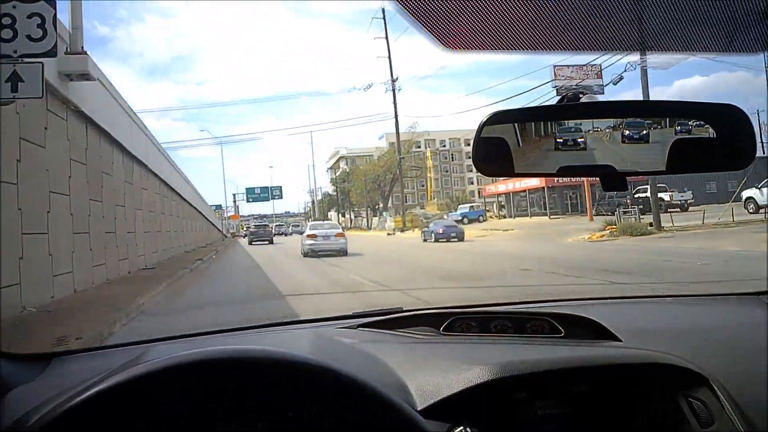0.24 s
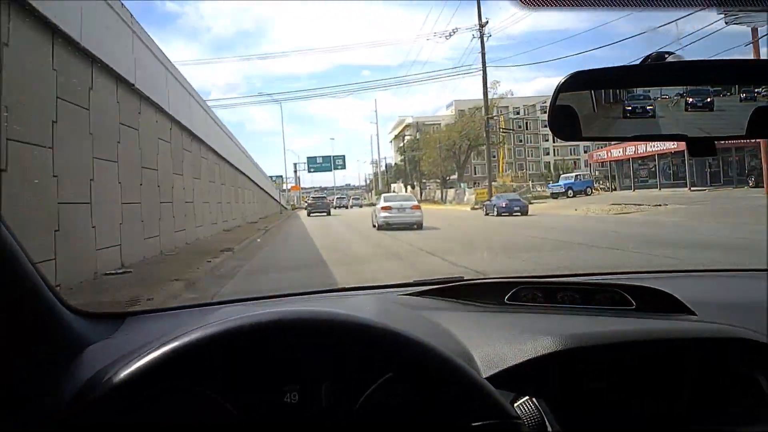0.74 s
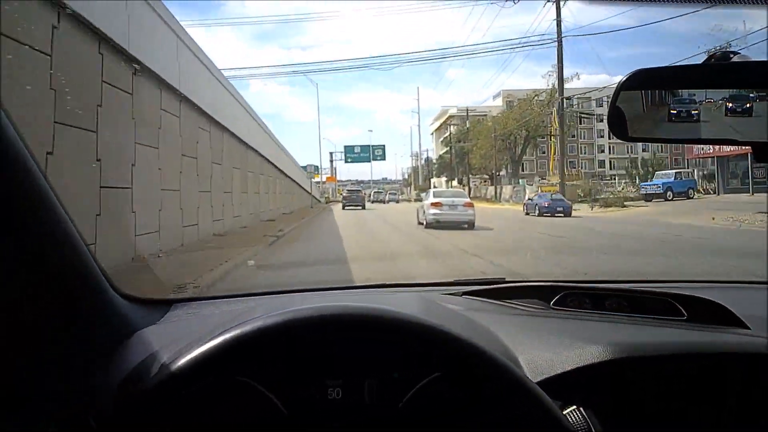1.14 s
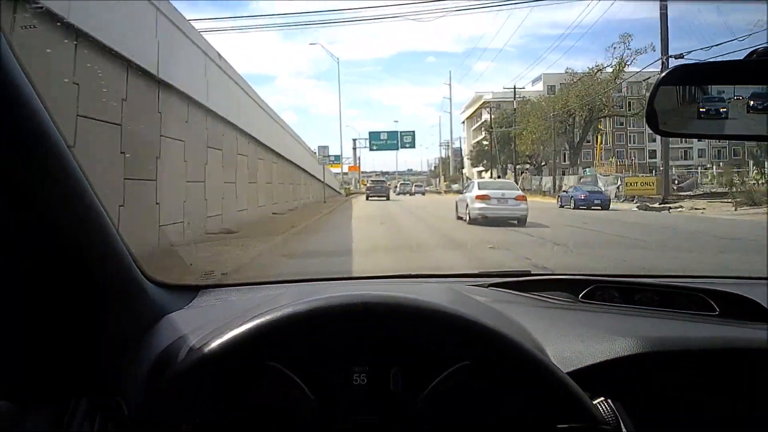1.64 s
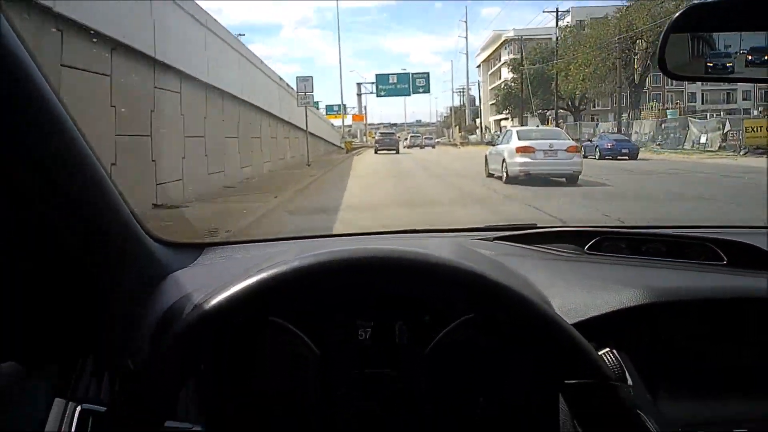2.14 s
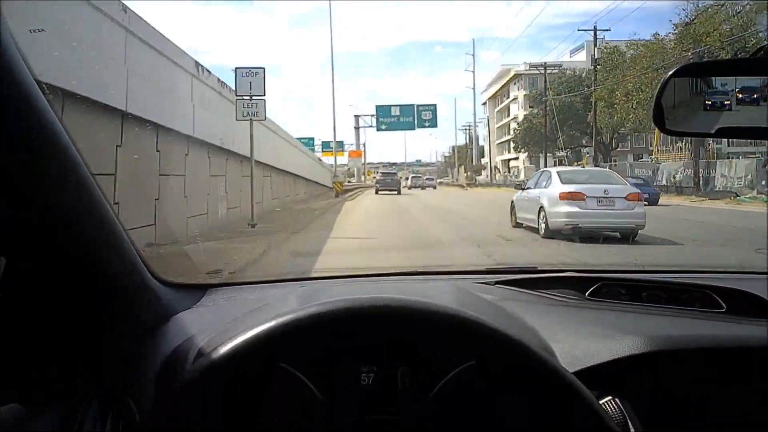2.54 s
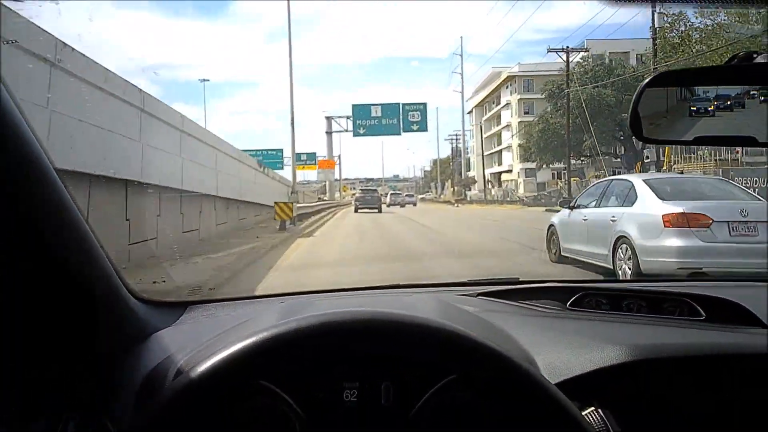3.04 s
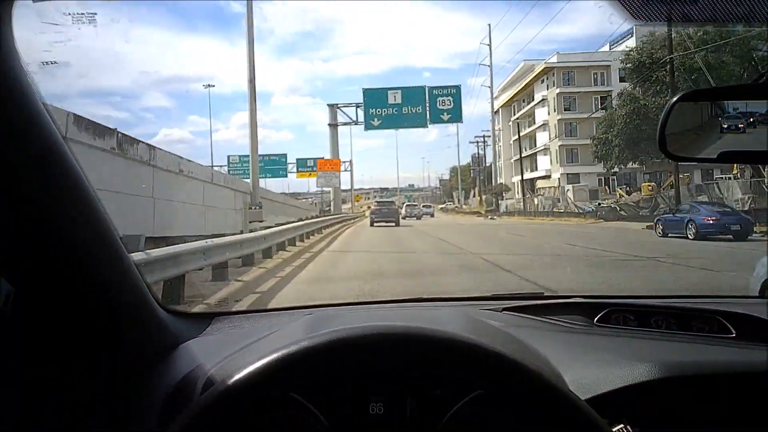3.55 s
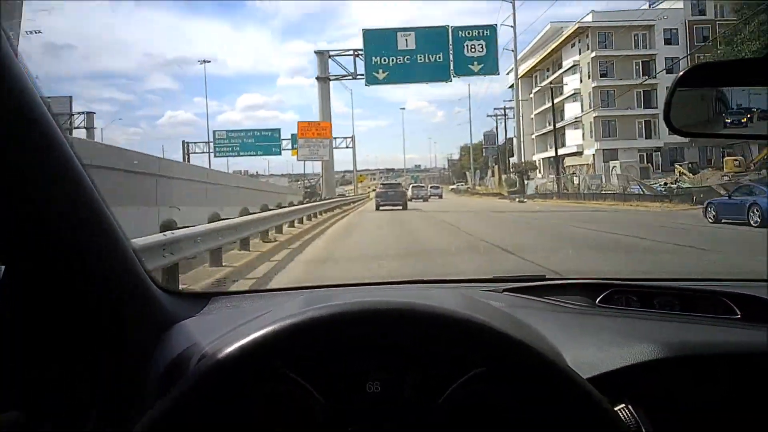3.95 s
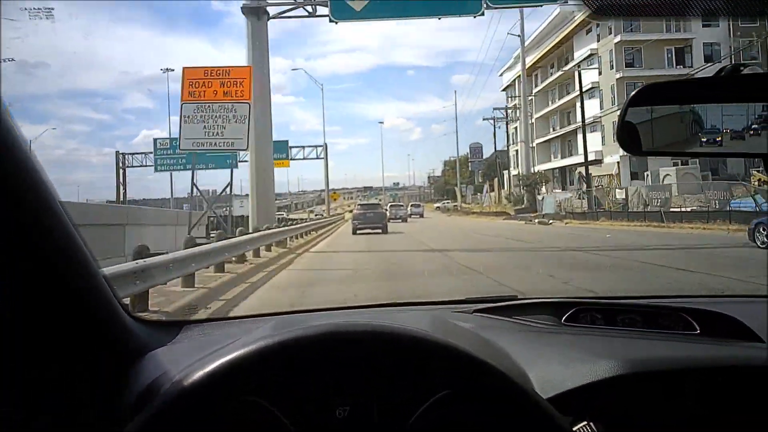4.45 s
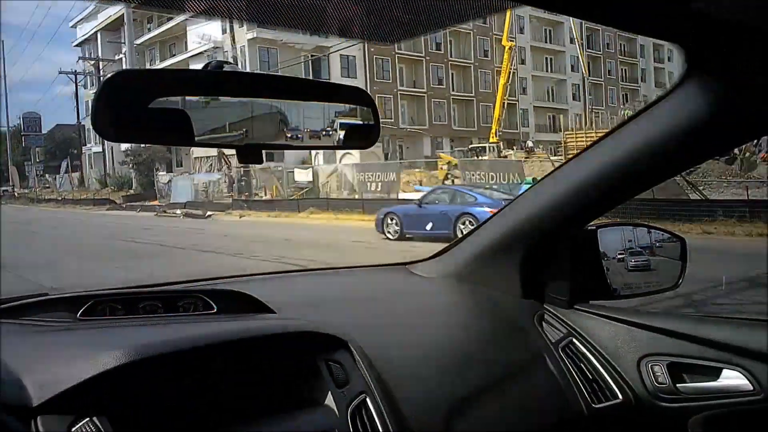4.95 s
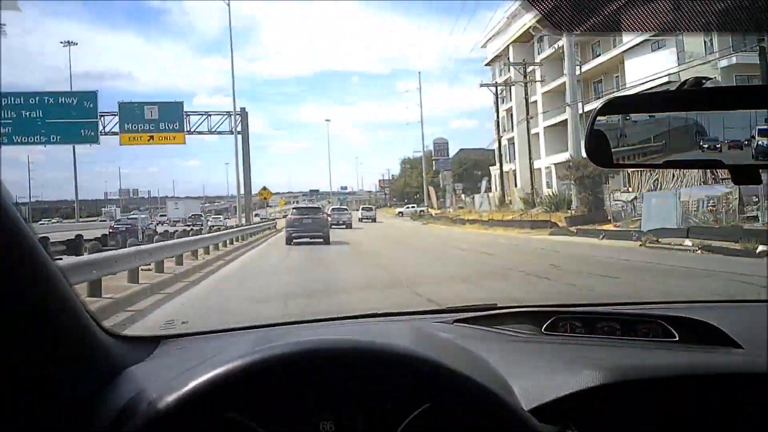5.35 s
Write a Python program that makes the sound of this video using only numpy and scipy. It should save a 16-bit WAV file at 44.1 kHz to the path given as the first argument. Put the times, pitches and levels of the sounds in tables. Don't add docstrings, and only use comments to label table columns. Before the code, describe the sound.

The sound starts mid-acceleration inside a car cabin. A strong, resonant engine drone rises steadily from 0 to about 1.9 seconds, with intake roar, fine valve sizzle and faint hiss around it. A few light plastic ticks sound in the first second, and deep body bumps begin near 1.1. At 1.9 the throttle closes, with a short air puff at 2.0; heavy low thumps, a faint gear whine and a dry clutch scuff fill the upshift until about 2.4. The engine note drops markedly, then pulls again, lower and climbing gently, under a fuller airy roar. At 3.94 it cuts suddenly to a soft burble that fades into a steady, slightly falling coast. Tyre rumble grows, with a road joint at 4.35, a sharp bright trim click at 4.5, a smoother dip near 4.65, and low bumps around 5.45. Close, damped and dull on top, through a small head-worn microphone.

```python
import sys
import numpy as np
from scipy import signal
from scipy.fft import rfft, irfft, next_fast_len
from scipy.io import wavfile
from scipy.ndimage import uniform_filter1d

SR = 44100
rng = np.random.default_rng(int(sys.argv[2]) if len(sys.argv) > 2 else 0)


def master_out(mix):
    frames = np.transpose(np.atleast_2d(mix))
    ceiling = np.clip(frames, -1, 1)
    pcm = np.round(ceiling * 32767).astype(np.int16)
    wavfile.write(sys.argv[1], SR, pcm)


def field_ratio(decibels):
    return 10 ** (np.asarray(decibels, dtype=float) / 20)


N = 247401
T = np.arange(N) / SR
CLUTCH_S = 2.3
SHUT_DB = -42.5

# [opens_s, build_up_s, shuts_s, fall_db_per_s]
PULLS = [
    (-.16, .12, 1.884, 116),
    (2.28, .13, 3.94, 746),
]


def read(points, hz):
    f, value = np.transpose(points)
    return np.interp(np.log(hz + 1), np.log(f + 1), value)


def evened(x):
    return x / np.sqrt(np.mean(x ** 2) + 1e-20)


def swells(rows):
    return sum(db * np.exp(-(2 * (T - s) / length) ** 2) for s, db, length in rows)


def wander(rate_hz, t=T):
    knots_per_s = 60
    knots = rng.standard_normal(int(T[-1] * knots_per_s) + 2)
    knot_hz = np.fft.rfftfreq(len(knots), 1 / knots_per_s)
    spectrum = rfft(knots) / (1 + (knot_hz / rate_hz) ** 4)
    drift = evened(irfft(spectrum, len(knots)))
    return np.interp(t, np.arange(len(knots)) / knots_per_s, drift)


def noise(colour, patchy_db, flicker_db):
    frames, hz = N // 256 + 5, np.fft.rfftfreq(1024, 1 / SR)
    real, imaginary, patches = rng.standard_normal((frames, 513, 3)).T
    patches = uniform_filter1d(patches, size=10, axis=0)
    patches = evened(uniform_filter1d(patches, size=12, axis=1))
    flicker = evened(uniform_filter1d(rng.standard_normal(frames), size=3))
    level_db = read(colour, hz)[:, None] + patchy_db * patches + flicker_db * flicker
    z = (real + 1j * imaginary) * field_ratio(level_db)
    return evened(signal.istft(z, nperseg=1024, noverlap=768)[1][:N])


def tinted(colour):
    size = next_fast_len(N)
    gain = field_ratio(read(colour, np.fft.rfftfreq(size, 1 / SR)))
    return evened(irfft(rfft(rng.standard_normal(size)) * gain, size)[:N])


def cycle_rate():
    # [time_s, cycle_hz]
    speed = [(0, 39.43), (0.3, 42.18), (0.45, 43.91), (0.6, 45.02), (1.05, 47.91), (1.35, 50.18),
             (1.5, 50.47), (1.9, 53.69), (2.0, 53.3), (2.3, 46.2), (2.4, 41.5), (2.5, 35.98), (2.6, 36.85),
             (3.3, 39.55), (3.6, 41.0), (3.93, 42.23), (4.4, 40.69), (5.6, 40.19)]
    s, hz = np.transpose(speed)
    return np.interp(T, s, hz)


def load():
    # [centre_s, change_db, length_s]
    sags = [
        (1.25, -1.5, 0.18),
        (2.52, -2.5, 0.19),
    ]
    pulls = []
    for opens, build, shuts, fall in PULLS:
        rise_db = 20 * np.log10(1 - np.exp(-np.maximum(T - opens, 1e-6) / build))
        pulls.append(rise_db - fall * np.maximum(T - shuts, 0))
    return np.maximum(np.max(pulls, axis=0) + swells(sags), SHUT_DB)


def cabin(hz):
    # [centre_hz, width_hz, level_db]
    modes = [(148.9, 14.6, 18), (208, 17, -1.4), (236.6, 20, 1.1), (256.6, 18.36, 11), (273, 14, -10),
             (319.5, 29, -13), (384.4, 26, 1.2), (399, 15, -1.1), (482, 29, 6.5), (528, 35, -5),
             (555.5, 15, -8.5), (595, 23, -9.5), (683, 54, 0.1), (759, 51, 9.6)]
    response = sum(field_ratio(db) / (1 + 2j * (hz - f) / width) for f, width, db in modes)
    return 20 * np.log10(abs(response) + 1e-3)


def engine():
    # [cycle_multiple, rms_db, slope_db_per_hz, bend_db_per_hz2], at mid_hz
    firing = [(4, -29, 1.33, -0.0586), (5, -31, -0.88, 0.0169), (6, -40.5, 0.5, 0.1368),
              (7, -8.5, 0.64, -0.2723), (8, -23.5, -0.24, 0.0115), (9, -31.5, -1.36, 0.1523),
              (10, -37.5, -1.5, -0.0615), (11, -42.7, -0.38, 0.2074), (12, -34.5, 0.82, -0.0792),
              (13, -36, 0.23, -0.2305), (14, -43, -0.33, -0.1817), (15, -47, -1.14, 0.0741),
              (16, -55.0, -1.13, 0.2491)]
    # [cycle_multiple, rms_db, loudest_at_cycle_hz,
    # speed_range_hz]
    side_lines = [(10.45, -33.5, 48, 2.2), (16.17, -38.5, 46, 1.7), (19.09, -42.5, 40.5, 2.5),
                  (13, -36.5, 41, 1.2), (16, -40.5, 52, 1.2), (28.05, -50, 53, 2),
                  (39.15, -51.5, 37.5, 2.9), (39.6, -59, 48.5, 2.2), (40, -53, 52.5, 1.7)]
    # [cycle_multiple, rms_db]
    coast = [(3, -30.5), (4, -34.5), (6, -38.5), (8, -41), (12, -48), (16, -50), (20, -49)]
    mid_hz = 44.5
    knock_db, knock_slope_db = -51, -0.7957
    burble_db, burble_s = 4.5, 0.37
    step = 8
    t, hz, load_db = T[::step], cycle_rate()[::step], load()[::step]
    turns = np.cumsum(hz) * step / SR

    def line(multiple, db, wobble_db, slip):
        phase = multiple * turns + rng.random() + slip * wander(5.2, t)
        return np.sqrt(2) * field_ratio(db + wobble_db * wander(14, t)) * np.sin(2 * np.pi * phase)

    out = np.zeros(len(t))
    for multiple, db, db_per_hz, bend in firing:
        lead = multiple == 7
        off_hz = hz - mid_hz
        full_db = db + (db_per_hz + bend * off_hz) * off_hz + cabin(multiple * hz)
        level_db = full_db + load_db * (1 if lead else 1.4)
        out += line(multiple, level_db, 0.7 if lead else 0.19 * multiple, 0.0004 * multiple ** 2)
    for multiple, db, at_hz, range_hz in side_lines:
        out += line(multiple, db - 6 * ((hz - at_hz) / range_hz) ** 2 + load_db, 2.9, 0.081)
    for multiple in range(17, 38):
        level_db = knock_db + knock_slope_db * (multiple - 17) + load_db + 3.2 * wander(2.1, t)
        out += line(multiple, level_db, 0.46, 0.014)
    shut = np.clip(-load_db / 30, 0, 1) ** 2
    burble = field_ratio(burble_db * np.exp(-abs(t - PULLS[-1][2]) / burble_s))
    out += shut * burble * sum(line(multiple, db, 2.0, 0.053) for multiple, db in coast)
    return signal.resample_poly(out, step, 1)[:N]


def roar():
    # [freq_hz, level_db]
    roar_colour = [(150, -24.5), (260, 0.5), (420, -1), (600, -9), (900, -10), (1500, -16.5), (1780, -25.5),
                   (2100, -24), (2900, -38.5), (4400, -44), (6000, -49.5)]
    # [freq_hz, level_db]
    hiss_colour = [(2500, 2), (4500, -3), (5700, 4.5), (7200, 5.5), (7800, -11.5), (8300, -30), (9000, -62)]
    # [freq_hz, level_db]
    valve_colour = [(1500, -26.5), (2200, -3.5), (2900, -6), (3500, 0), (3900, 1), (4300, -8.5),
                    (4800, -22)]
    # [centre_s, change_db, length_s]
    puffs = [
        (.91, 0, .04),
        (2.03, 4, .04),
        (3.95, 0, 0.033),
    ]
    roar_db, db_per_hz, full_hz = -34.5, 0.8439, 46.4
    gear_db, gear_s, coast_db = 5.5, 0.13, -3
    valves_db, hiss_db = -57.5, -65
    hz, load_db = cycle_rate(), load()
    pulse = 1 + 0.028 * field_ratio(load_db) * np.cos(2 * np.pi * np.cumsum(hz) / SR)
    db = roar_db + db_per_hz * np.minimum(hz - full_hz, 0) + swells(puffs)
    db = db + gear_db * (1 + np.tanh((T - CLUTCH_S) / gear_s)) / 2 + coast_db * load_db / SHUT_DB
    intake = field_ratio(db + 5.0) * pulse * noise(roar_colour, 0.43, 0.23)
    sizzle_db = valves_db + 0.11 * load_db + 0.34 * (hz - 44.5) + 0.61 * wander(2.7)
    valves = field_ratio(sizzle_db) * noise(valve_colour, 1.2, 0.31)
    hiss = field_ratio(hiss_db + 0.25 * (db + 30.5)) * noise(hiss_colour, 0.8, 0.4)
    return intake + valves + hiss


def boom():
    # [centre_s, peak_db, pitch_hz, length_s]
    bumps = [(0.147, -26.5, 27.7, 0.06), (1.11, -19.5, 28.5, 0.044), (1.222, -23, 29.3, 0.05),
             (1.377, -25.5, 27.7, 0.06), (1.672, -28, 26, 0.061), (1.848, -21, 28.9, 0.05),
             (1.996, -18.5, 24.2, 0.049), (2.131, -13, 29.6, 0.059), (2.321, -15, 24.9, 0.092),
             (2.42, -25, 26.36, 0.3), (2.627, -19, 26.9, 0.045), (3.052, -18.5, 28, 0.05),
             (3.19, -19.5, 30.1, 0.04), (3.39, -24.5, 25, 0.04), (3.499, -24, 24.8, 0.06),
             (3.737, -22, 32.1, 0.077), (3.92, -25.5, 36.7, 0.05), (4.035, -16, 30.1, 0.037),
             (4.116, -19.5, 31.67, 0.27), (4.255, -22.5, 31.8, 0.21), (4.61, -24.5, 29.2, 0.14),
             (4.89, -22.5, 30.1, 0.057), (5.443, -16.5, 35, 0.06), (5.52, -19, 30.0, 0.054)]
    thuds_db = -31
    waver = np.cumsum(0.08 * wander(6.8)) / SR
    tone = np.zeros(N)
    for s, db, hz, length in bumps:
        swell = field_ratio(db) * np.exp(-((T - s) / length) ** 2)
        tone += swell * np.sin(2 * np.pi * hz * (T - s + waver))
    thuds = tinted([(6, -18.5), (14, 2.0), (30, 6), (52, 4), (75, -22), (150, -63.5)])
    return np.sqrt(2) * tone * field_ratio(0.9 * wander(7.2)) + field_ratio(thuds_db) * thuds


def tyres():
    # [freq_hz, level_db]
    rumble_colour = [(12, -7.5), (40, -2), (62, 0.5), (115, 6), (160, -2), (210, -2.5), (300, -24),
                     (450, -25), (700, -59.5)]
    # [centre_s, change_db, length_s]
    joints = [(.36, -6.5, .1), (.51, 3, 0.037), (.84, 3.5, 0.07), (1.54, -11.5, .08), (1.96, 3, .08),
              (2.27, -5, 0.061), (2.48, 2, .1), (3.05, 5.5, 0.044), (3.54, 4.5, .06), (3.8, 3.5, 0.044),
              (4.09, 5.5, 0.1), (4.34, 10, 0.037), (4.42, 4, 0.041), (4.64, -13, 0.093), (4.7, 4, .06),
              (5.06, -8, .08), (5.23, 3.5, 0.087)]
    rumble_db, rise_db_per_s = -27, 0.5
    rumble = tinted(rumble_colour)
    rumble = rumble / np.sqrt(uniform_filter1d(rumble ** 2, size=5000))
    return field_ratio(rumble_db + rise_db_per_s * T + swells(joints)) * rumble


def gearshift():
    # [centre_s, pitch_hz, level_db, half_length_s]
    gear = (2.22, 1400, -43.5, .11)
    # [centre_hz, width_hz, level_db, half_length_s]
    clutch = (1300, 301, -40.5, 0.1)
    s, gear_hz, gear_db, gear_half_s = gear
    hz, width_hz, scuff_db, scuff_half_s = clutch
    whine = np.sin(2 * np.pi * np.cumsum(gear_hz * (1 + 0.0033 * wander(7.1))) / SR)
    whine = whine * field_ratio(gear_db + 2.5 * wander(12)) * np.exp(-((T - s) / gear_half_s) ** 4)
    half_hz, skirt_hz = width_hz / 2, 2 * width_hz
    scuff = tinted([(hz - skirt_hz, -40), (hz - half_hz, 0), (hz + half_hz, 0), (hz + skirt_hz, -40)])
    return whine + field_ratio(scuff_db) * scuff * np.exp(-((T - CLUTCH_S) / scuff_half_s) ** 2)


def rattles():
    # [start_s, peak_db, low_panel_db, scrape_db_relative_to_peak]
    ticks = [(0.164, -37, -51, -18.5), (0.1803, -33, -45, -20.5), (0.255, -41.5, -44.5, -18),
             (0.3613, -47, -54.5, -12.5), (0.5871, -37.5, -46, -15), (0.9452, -42, -39, -10),
             (1.0425, -40, -37, 5), (1.0551, -40, -42.5, -1), (1.9546, -48, -48, -11),
             (2.006, -52, -36.5, -12), (2.0197, -42, -30.5, -12), (2.7794, -49, -44.5, -11.5),
             (3.5491, -46, -48, -9.5), (4.359, -42.5, -51, -9), (4.4851, -18, -35, -22),
             (4.7306, -44, -51, -10), (5.159, -44, -63, -12), (5.3732, -55, -50, -17)]
    # [pitch_hz, level_db]
    trim = [(3350, -13), (3680, -1), (3870, 0), (4090, -6), (4400, -17)]
    panel_hz, overtone_hz, chatter_t60_s = 2110, 5700, 0.065
    strike = 8.0
    padding = signal.butter(8, 4600, fs=SR, output="sos")
    scrape_band = signal.butter(3, (2200, 3600), "band", fs=SR, output="sos")
    out, t = np.zeros(N), np.arange(5000) / SR
    fade = field_ratio(-60 * t / chatter_t60_s) * np.minimum(t / 0.002, 1)
    detunes = rng.uniform(1.0, 1.015, (len(ticks), len(trim)))
    for (s, db, panel_db, scrape_db), detune in zip(ticks, detunes):
        uneven = field_ratio(1.5 * rng.standard_normal(50)).repeat(100)
        chatter = rng.standard_normal(len(t)) * fade * uneven
        chatter[80] += strike
        bright = sum(field_ratio(d) * np.sin(2 * np.pi * f * k * t) for (f, d), k in zip(trim, detune))
        bright = bright * field_ratio(-60 * t / 0.026)
        panel = np.sin(2 * np.pi * panel_hz * t) + field_ratio(-19.5) * np.sin(2 * np.pi * overtone_hz * t)
        panel = panel * field_ratio(-60 * t / 0.03)
        rung_trim = signal.fftconvolve(chatter, bright)[:len(t)]
        rung_panel = signal.fftconvolve(chatter, panel)[:len(t)]
        scrape = signal.sosfilt(scrape_band, rng.standard_normal(len(t)) * fade)
        tick = field_ratio(db) * rung_trim / abs(rung_trim).max()
        tick += field_ratio(db + scrape_db) * scrape / abs(scrape).max()
        knock = field_ratio(panel_db - 1.0) * rung_panel / abs(rung_panel).max()
        part = out[round(s * SR):][:len(t)]
        part += (signal.sosfilt(padding, tick) + knock)[:len(part)]
    return out


def scene():
    return (engine() + roar() + boom() + tyres() + gearshift() + rattles())[None]


def top_cut(x):
    return signal.sosfilt(signal.butter(12, 8240, fs=SR, output="sos"), x)


def record(dry):
    # [freq_hz, gain_db]
    mic_top = [(100, 0), (7300, -0.5), (7800, -5), (8100, -18), (8400, -29.5)]
    hz, _, z = signal.stft(dry[0], SR, nperseg=1536, noverlap=768)
    z = z * field_ratio(read(mic_top, hz))[:, None]
    mix = signal.istft(z, SR, nperseg=1536, noverlap=768)[1][:N]
    return top_cut(mix[None])


dry = scene()
out = record(dry)
master_out(out)
```